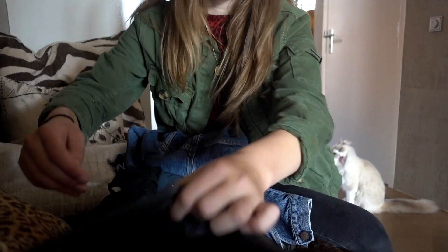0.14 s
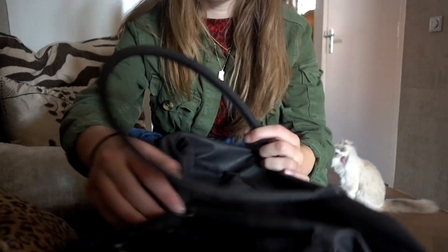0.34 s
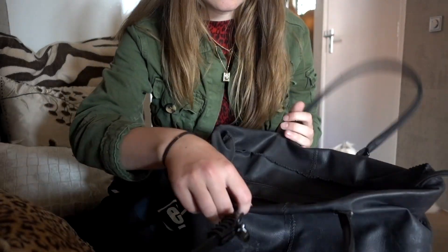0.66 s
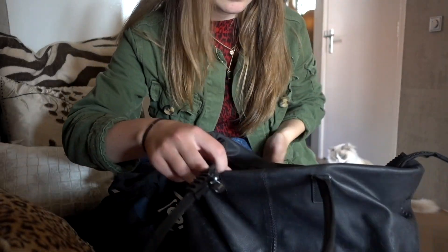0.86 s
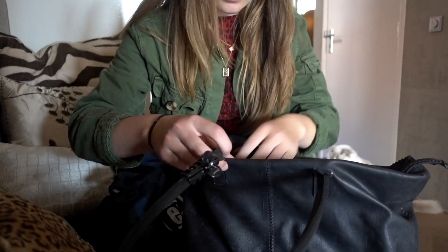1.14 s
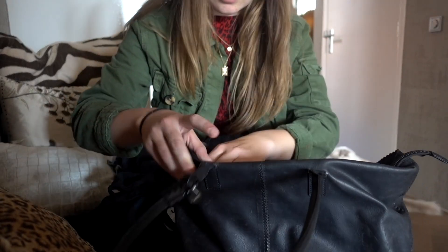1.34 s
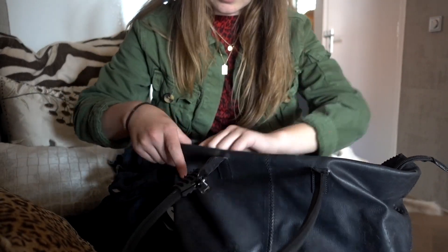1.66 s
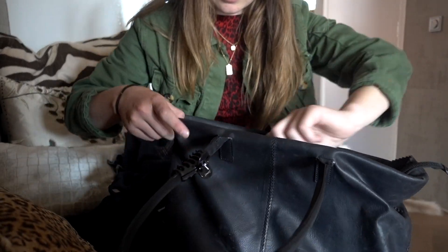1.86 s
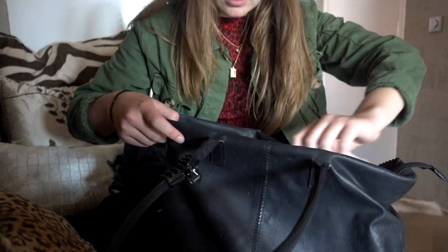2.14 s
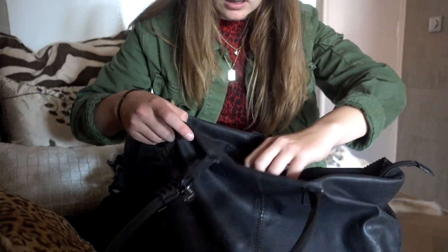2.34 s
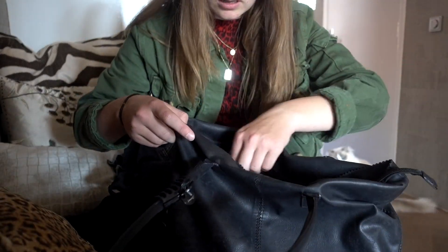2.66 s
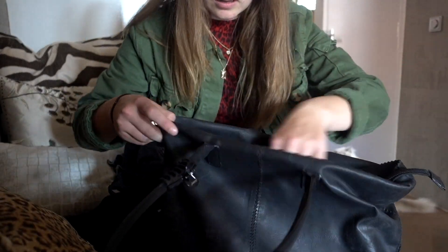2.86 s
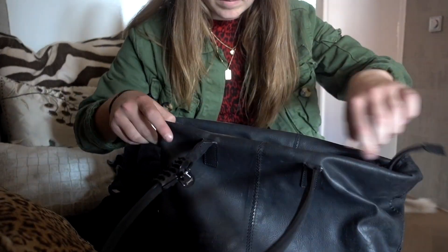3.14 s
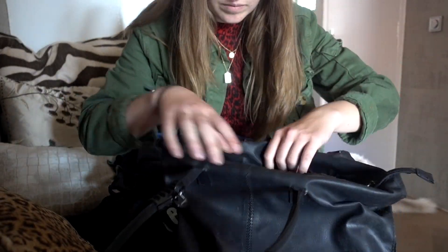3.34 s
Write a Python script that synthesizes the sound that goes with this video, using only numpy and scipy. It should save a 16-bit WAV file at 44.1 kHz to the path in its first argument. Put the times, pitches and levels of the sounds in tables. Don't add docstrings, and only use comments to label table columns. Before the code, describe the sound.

A leather bag is searched by hand, rustling with hollow knocks and soft thuds; a short low zip buzz comes midway, a louder, faster one near the end. Close stereo microphone, small furnished room.

```python
import sys
import numpy as np
from scipy import signal
from scipy.fft import rfft, irfft
from scipy.io import wavfile
from scipy.ndimage import uniform_filter1d

SR = 44100
rng = np.random.default_rng(int(sys.argv[2]) if len(sys.argv) > 2 else 0)


def magnitude_from_level(level_db):
    exponent = np.asarray(level_db, float) / 20
    return 10 ** exponent


def store_wav(level_fs):
    pcm = np.round(np.clip(np.atleast_2d(level_fs), -1, 1) * 32767)
    wavfile.write(sys.argv[1], SR, pcm.T.astype(np.int16))


N = 154350
T = np.arange(N) / SR
ECHO_S = .0062


def level(x, db):
    return x * magnitude_from_level(db) / np.sqrt(np.mean(x ** 2))


def colour(x, table):
    hz, gain_db = np.array(table, float).T
    bins_hz = np.arange(2049) * SR / 4096
    db = np.interp(np.log(bins_hz + 1), np.log(hz), gain_db)
    cepstrum = irfft(db * np.log(10) / 20)
    cepstrum[1:2048] *= 2
    cepstrum[2049:] = 0
    response = irfft(np.exp(rfft(cepstrum)))[:2048]
    return signal.fftconvolve(x, response)[:N]


def walk(rate):
    k = int(SR / rate)
    steps = rng.standard_normal(N // 200)[:N // k + 1]
    held = np.repeat(steps, k)[:N]
    return 1.3 * uniform_filter1d(uniform_filter1d(held, k), k)


def grains(share, spread_db):
    draw = rng.random((2, N))
    sizes = magnitude_from_level(-spread_db * np.log(draw[1] + 1e-4))
    return level(rng.standard_normal(N) * (draw[0] < share) * sizes, 0)


def place(times, sizes):
    out = np.zeros(N + 2)
    at = np.clip(np.asarray(times) * SR, 0, N - 1)
    k = at.astype(int)
    np.add.at(out, k, sizes * (1 - at + k))
    np.add.at(out, k + 1, sizes * (at - k))
    return out[:N]


def split(x, hz=3900):
    return [signal.sosfilt(signal.butter(4, hz, kind, fs=SR, output="sos"), x) for kind in ("low", "high")]


def decay(u, t60):
    return np.exp(-np.log(1000) * u / t60)


def swell(start, length, attack=.004):
    u = np.maximum(T - start, 0)
    return (1 - np.exp(-u / attack)) * np.exp(-(2.47 * u / length) ** 2)


def ring(x, modes, between_db, patchy_db=0):
    out = magnitude_from_level(between_db) * x
    for hz, width, db in modes:
        peak = signal.lfilter(*signal.iirpeak(hz, hz / width, fs=SR), x)
        out = out + magnitude_from_level(db + patchy_db * walk(22.19)) * peak
    return out


# (time [s], level [dB], extra brightness [dB])
HAND = [(0, -61, 9), (0.102, -48, -1.5), (.45, -46.5, 1.5), (.75, -48.5, 1.5), (.9, -50.5, -2),
        (1.02, -58, 1.5), (1.2, -66, -11), (1.3, -54, 1), (1.75, -51.5, 2.5), (2.05, -48, -3),
        (2.17, -56, 6), (2.4, -52.5, -0.5), (2.8, -60, -8), (2.9, -58, 5), (3.15, -50, 1.5),
        (3.5, -49.5, 1)]
# (frequency [Hz], gain [dB])
LEATHER = [(35, -55), (60, -53.5), (206, -5.5), (604, 1), (1130, 0), (2130, 3), (4380, -12), (9910, -11.5),
           (15800, -18)]
# (frequency [Hz], width [Hz], gain [dB])
WALLS = [(660, 207, -5), (1530, 245, -10.5), (2096, 470, -12), (2650, 430, -10), (3270, 590, -7)]
SLIDE_STARTS = [.093, .245, .335, .425, .487, .68, .835, 1.222, 1.256, 1.395, 1.519, 1.81, 1.915, 2.2, 2.69,
                2.764, 3.257]
# (length [s], level [dB], extra brightness [dB])
SLIDES = [(0.34, -46.5, -25), (0.18, -41, -13), (0.092, -44, 3.5), (0.083, -41, 6.5), (0.074, -45.5, 3),
          (0.19, -44.5, -14), (0.065, -49, -10), (0.14, -48, -1), (0.11, -41.5, 4), (0.15, -58.5, 10.5),
          (0.0089, -30, -17), (0.11, -39, 10), (0.039, -34, 5), (0.16, -68.5, 20.5), (0.2, -42.5, -4.5),
          (0.096, -36.5, -4.5), (0.096, -43.5, 8.5)]


def rustle():
    fold_hz = 1300
    folds = split(level(colour(grains(.02, 2.0), LEATHER), 0), fold_hz)[0] * magnitude_from_level(1.8 * walk(30))
    creases = split(level(colour(grains(.08, 1.8), LEATHER), 0))[0]
    creases = split(creases, fold_hz)[1] * magnitude_from_level(1.6 * walk(60))
    hiss = split(level(colour(grains(.5, 2.2), LEATHER), 0))[1] * magnitude_from_level(0.65 * walk(23.6))
    t, db, bright_db = np.array(HAND).T
    low = magnitude_from_level(np.interp(T, t, db) + 0.26 * walk(12))
    high = low * magnitude_from_level(np.interp(T, t, bright_db))
    for start, (length, slide_db, shine_db) in zip(SLIDE_STARTS, SLIDES):
        low = np.hypot(low, magnitude_from_level(slide_db) * swell(start, length))
        high = np.hypot(high, magnitude_from_level(slide_db + shine_db) * swell(start, length, attack=0.011))
    return low * ring(folds + creases, WALLS, -4.5, patchy_db=5.0) + high * hiss


# (frequency [Hz], width [Hz], gain [dB])
SLIDER = [(904, 75, 2), (1476, 115, -2), (1702, 220, 2.5), (1870, 1100, -7), (2450, 400, 2),
          (2977, 70, 6.5)]


def zip_pull(curve, body, drift, uneven_db, scrape_db):
    t, hz, db = np.array(curve).T
    phase = np.cumsum(np.interp(T, t, hz) * (1 + drift * walk(120))) / SR
    late, uneven = rng.standard_normal((5000, 2))[:int(phase[-1])].T
    times = np.interp(np.arange(len(late)) + .04 * late, phase, T)
    clicks = colour(place(times, magnitude_from_level(uneven_db * uneven)), body)
    teeth = level(ring(clicks, SLIDER, -6.5), 0)
    flares = grains(0.34, 0.33) * np.exp(-(phase % 1) / .6)
    scrape, top = split(level(colour(flares, body), 0))
    pull = magnitude_from_level(np.interp(T, t, db, left=-120, right=-120) + .7 * walk(90))
    low, high = split(split(split(teeth)[0], 140)[1], 1200)
    buzz = low * magnitude_from_level(1.5 + 2.5 * walk(150)) + high * magnitude_from_level(1.5 + 2 * walk(150))
    return magnitude_from_level(-5.5) * pull * (buzz + magnitude_from_level(scrape_db) * ring(scrape, SLIDER, 0.014) + magnitude_from_level(-4) * top)


# (time [s], teeth per second [Hz], level [dB])
ZIP_SLOW = [
    (1.78, 430, -54),
    (1.8, 445, -37),
    (1.85, 445, -33),
    (1.87, 355, -31),
    (1.89, 350, -29.5),
    (1.908, 320, -34),
    (1.935, 303, -31),
    (1.965, 315, -34),
    (1.985, 335, -50),
]
# (frequency [Hz], gain [dB])
ZIP_SLOW_BODY = [(100, -31), (330, 5.5), (900, 4), (3000, -4.5), (4000, -9), (13000, -10), (15800, -12)]


def slow_zip():
    return zip_pull(ZIP_SLOW, ZIP_SLOW_BODY, drift=.025, uneven_db=3, scrape_db=-3)


# (time [s], teeth per second [Hz], level [dB])
ZIP_FAST = [
    (2.916, 812, -48),
    (2.936, 775, -26),
    (2.956, 712, -25),
    (3.002, 900, -24),
    (3.042, 1025, -22),
    (3.054, 960, -25),
    (3.066, 740, -23),
    (3.108, 600, -22),
    (3.135, 400, -38),
]
# (frequency [Hz], gain [dB])
ZIP_FAST_BODY = [(100, -29), (500, -4), (900, 1), (1600, -2), (3200, -1), (4000, -5.5), (13000, -10.5),
                 (15800, -18)]


def fast_zip():
    return zip_pull(ZIP_FAST, ZIP_FAST_BODY, drift=.02, uneven_db=1.5, scrape_db=-9)


# (time [s], peak [dB], pitch [Hz], hollow ring of the bag [dB])
KNOCKS = [(.1988, -36, 1100, -47), (.2575, -31, 1700, -48), (.354, -31, 1200, -46), (.4912, -34, 2000, -52),
          (.603, -38, 1800, -41), (.688, -39, 700, -46), (.853, -36, 750, -46), (1.259, -33, 1500, -46),
          (1.267, -32, 1600, -50), (1.5192, -28, 1900, -44), (1.526, -34, 2400, -50),
          (1.8004, -40, 650, -46), (1.884, -24, 1500, -40), (1.936, -22, 1100, -42),
          (2.0042, -24, 1600, -36), (2.052, -34, 800, -44), (2.0832, -35, 650, -40),
          (2.1067, -36, 560, -39), (2.4788, -39, 1600, -54), (2.4984, -36, 600, -42),
          (2.5952, -35, 800, -40), (2.631, -40, 1200, -44), (2.7138, -28, 1600, -54),
          (2.75, -37, 1700, -52), (2.8288, -38, 1500, -50), (2.9995, -18, 1500, -40),
          (3.1048, -15, 2200, -34), (3.2748, -30, 1500, -48), (3.328, -25, 1000, -40),
          (3.411, -39, 1300, -50), (3.4245, -41, 380, -40)]


def knocks():
    out = np.zeros(N + 4410)
    lead = 200
    u = (np.arange(4410) - lead) / SR
    late = np.maximum(u - ECHO_S + 0.0019, 0)
    hollow = np.sin(2 * np.pi * 460 * late) * decay(late, .028) * (1 - np.exp(-late / 0.0022))
    shuffle = level(colour(grains(0.41, 0.94), LEATHER), 0)
    for t, db, hz, hollow_db in KNOCKS:
        k = int(t * SR) - lead
        blow = -np.sin(2 * np.pi * hz * u) * np.exp(-(u * hz / .6) ** 2) * 1.17
        after = magnitude_from_level(-16.5) * np.resize(shuffle[k:], len(u)) * (u > 0) * np.exp(-u / 0.015)
        out[k:k + len(u)] += magnitude_from_level(db) * (blow + after) + magnitude_from_level(hollow_db + 4) * hollow
    return split(out[:N], 130)[1]


# (time [s], peak [dB], pitch [Hz], t60 [s])
PANELS = [(0.096, -51.5, 110, 0.043), (0.204, -42, 202, 0.035), (0.269, -49.5, 146, 0.044),
          (0.352, -39, 220, 0.03), (.437, -64, 60, 0.14), (.535, -42, 176, 0.025), (.525, -42, 680, .04),
          (.605, -35, 600, 0.044), (0.643, -39, 210, 0.048), (.73, -60, 80, .06), (0.767, -41, 450, 0.034),
          (.85, -42, 656, 0.079), (0.879, -54.5, 90, 0.065), (0.961, -47.5, 222, 0.069),
          (1.258, -31.5, 709, 0.051), (1.264, -55.5, 193, 0.12), (1.3, -61, 60, .1),
          (1.521, -33, 510, 0.023), (1.794, -28, 680, 0.027), (1.92, -58, 70, 0.087),
          (2.002, -46, 200, 0.06), (2.051, -32, 677, 0.027), (2.082, -34, 603, 0.06),
          (2.091, -63.5, 80, 0.14), (2.497, -38, 470, 0.033), (2.59, -54, 90, 0.061),
          (2.71, -40, 660, 0.029), (2.768, -35.5, 650, 0.095), (2.769, -42.5, 230, 0.082),
          (3.021, -45.5, 233, 0.16), (3.326, -41.5, 797, 0.079), (3.33, -56, 90, 0.11),
          (3.42, -62, 202, 0.051)]


def panels():
    out = np.zeros(N)
    for t, db, hz, t60 in PANELS:
        u = np.maximum(T - t, 0)
        build = 1 - np.exp(-u * hz / 0.95)
        out += magnitude_from_level(db) * np.sin(2 * np.pi * hz * u) * build * decay(u, t60)
    return split(out * magnitude_from_level(2.07 * walk(150)), 46)[1]


# (time [s], peak [dB], centre [Hz])
TICKS = [(0.0946, -34.5, 9400), (0.3632, -37, 10300), (0.4317, -30.5, 6600), (0.4472, -28, 10300),
         (0.5343, -29, 9500), (1.2665, -57, 7190), (1.422, -33, 9000), (1.479, -44.5, 9200),
         (1.5174, -70.5, 10200), (2.0468, -24.5, 14200), (2.1167, -34, 14570), (3.26, -33, 7830),
         (3.3227, -30, 6700), (3.479, -40.5, 6460)]


def ticks():
    out = np.zeros(N + 882)
    u = np.arange(882) / SR
    for t, db, hz in TICKS:
        edge = np.clip([hz * 0.64, hz * 1.28], 3000, 17000)
        snap = rng.standard_normal(len(u)) * np.exp(-u / 0.001)
        burst = signal.lfilter(*signal.butter(1, edge, "band", fs=SR), snap)
        k = int(t * SR)
        out[k:k + len(u)] += magnitude_from_level(db) * burst / np.abs(burst).max()
    return out[:N]


# (time [s], level [dB])
DRAG = [
    (1.0, -78),
    (1.06, -63),
    (1.2, -63),
    (1.33, -54.5),
    (1.4, -51),
    (1.47, -65.5),
    (1.57, -65.5),
    (1.65, -55),
    (1.78, -52),
    (1.85, -56),
]


def drag():
    t, db = np.array(DRAG).T
    seam_hz, width_hz = 2050, 450
    band = signal.iirpeak(seam_hz, seam_hz / width_hz, fs=SR)
    hiss = signal.lfilter(*band, signal.lfilter(*band, grains(.2, 1.1)))
    return level(hiss, 0) * magnitude_from_level(np.interp(T, t, db, left=-120, right=-120) + 3.0 * walk(40))


# (time [s], length [s], level [dB])
FIZZ = [
    (2.047, 0.065, -41),
    (2.106, 0.035, -42.5),
]


def fizz():
    band = signal.butter(2, [14100, 16100], "band", fs=SR, output="sos")
    metal = level(signal.sosfilt(band, grains(0.16, 1.6)), 0)
    return metal * sum(magnitude_from_level(db) * swell(t, length) for t, length, db in FIZZ)


def room(x):
    u = T[:SR // 2]
    tails = []
    for _ in range(2):
        low, high = split(rng.standard_normal(len(u)))
        tail = low * decay(u, 0.55) + high * decay(u, 0.43)
        tail = tail * np.clip((u - ECHO_S) / 0.0083, 0, 1)
        tails.append(signal.fftconvolve(x, tail * magnitude_from_level(-9) / np.sqrt(np.sum(tail ** 2)))[:N])
    return tails


# (frequency [Hz], gain [dB])
AIR = [(24, -104), (40, -46), (296, -16.5), (335, -10), (410, -9), (1010, -15), (1980, -11), (3800, -22.5),
       (15800, -30)]


def room_air():
    return level(colour(rng.standard_normal(N), AIR), -57) * magnitude_from_level(.5 * walk(7.9))


# (frequency [Hz], side minus mid [dB])
PORTS = [(60, -24), (110, -28), (200, -22), (380, -19.5), (700, -15), (1290, -5.5), (2380, -13.5),
         (4400, 2), (8120, -2), (15000, 1.5)]


def two_ports(near, wet, air):
    u = np.arange(1300) / SR
    smear = rng.standard_normal(len(u)) * np.exp(-u / .007)
    other = signal.fftconvolve(near, smear / np.sqrt(np.sum(smear ** 2)))[:N]
    other = np.real(signal.hilbert(other) * np.exp(2j * walk(24.92)))
    mid = near + wet[0] + air[0]
    side = colour(other + wet[1] + air[1], PORTS)
    balance_db = 1.13
    side = side + (magnitude_from_level(balance_db / 2) - 1) * split(mid, 340)[1]
    return magnitude_from_level(-0.5) * np.array([mid + side, mid - side])


def scene():
    bag = rustle() + slow_zip() + fast_zip() + knocks() + panels() + ticks() + drag() + fizz()
    near = bag + magnitude_from_level(-8) * np.roll(bag, int(ECHO_S * SR))
    return two_ports(near, room(bag), [room_air(), room_air()])


def band_limit(x):
    return signal.sosfilt(signal.butter(12, 16820, fs=SR, output="sos"), x)


def record(dry):
    mix = signal.sosfilt(signal.ellip(8, .3, 50, 15900, fs=SR, output="sos"), dry)
    return band_limit(mix)


dry = scene()
out = record(dry)
store_wav(out)
```